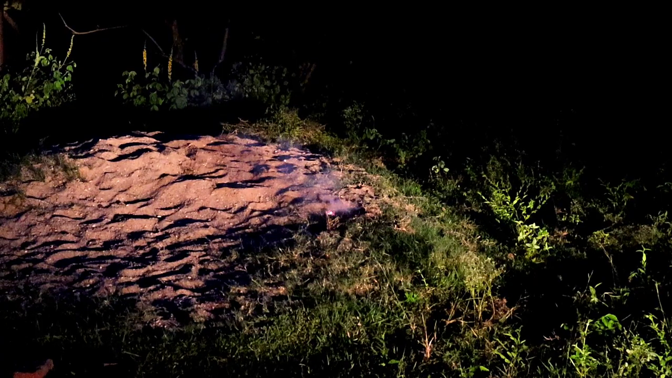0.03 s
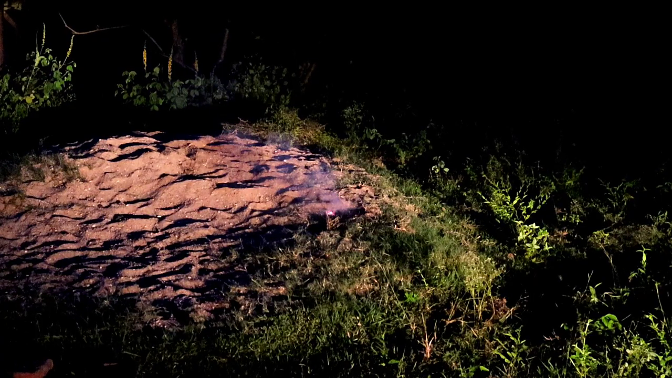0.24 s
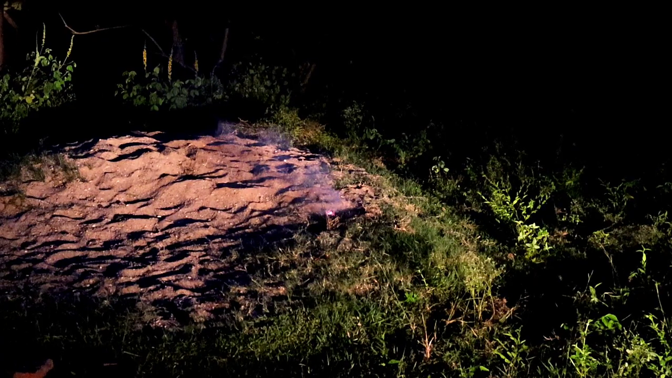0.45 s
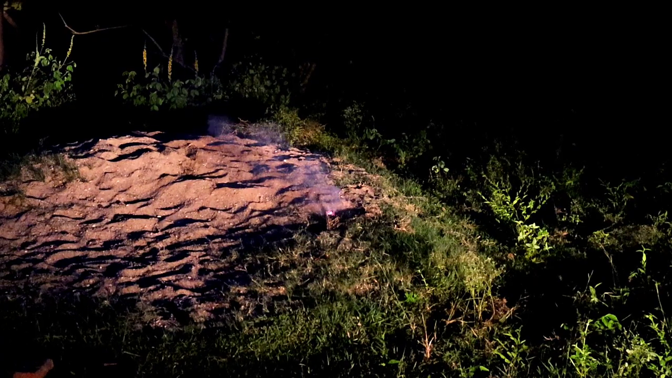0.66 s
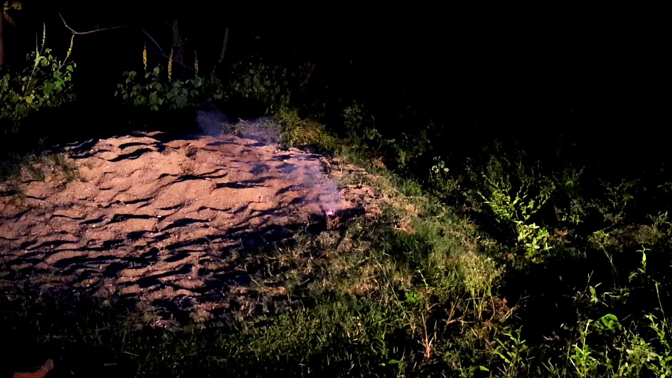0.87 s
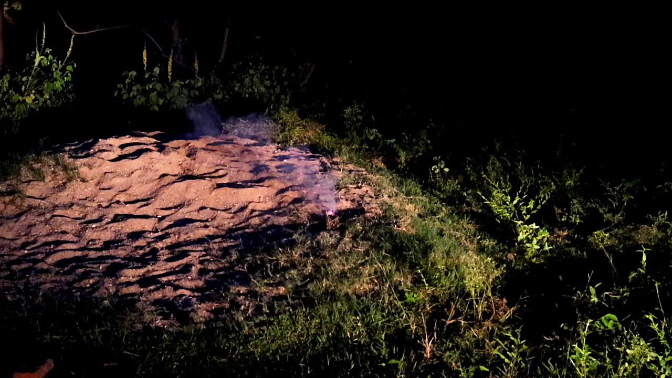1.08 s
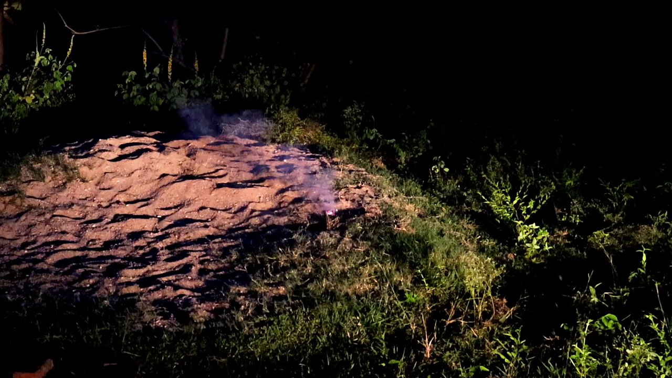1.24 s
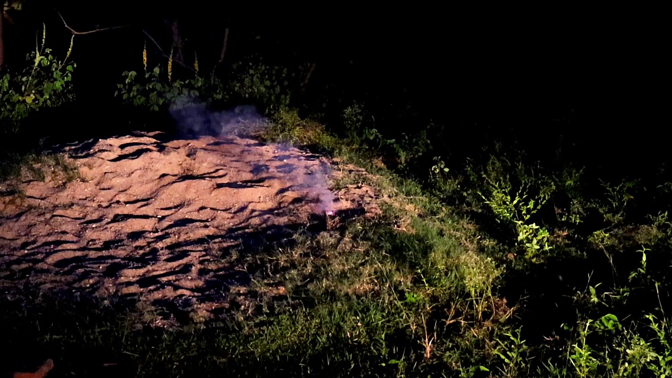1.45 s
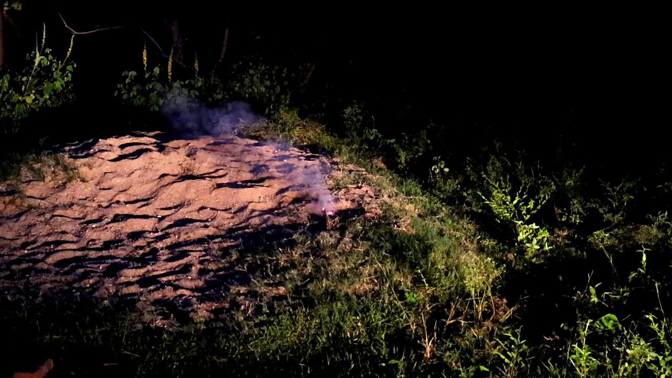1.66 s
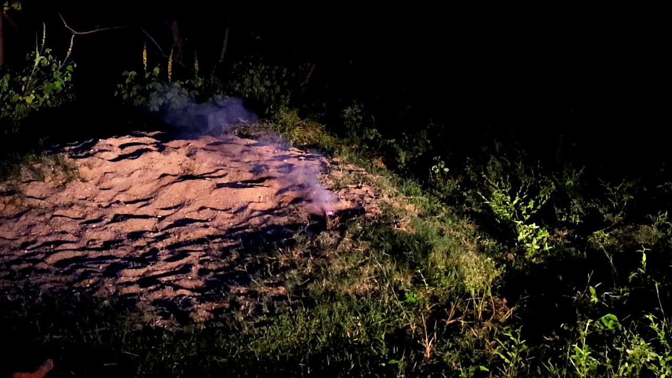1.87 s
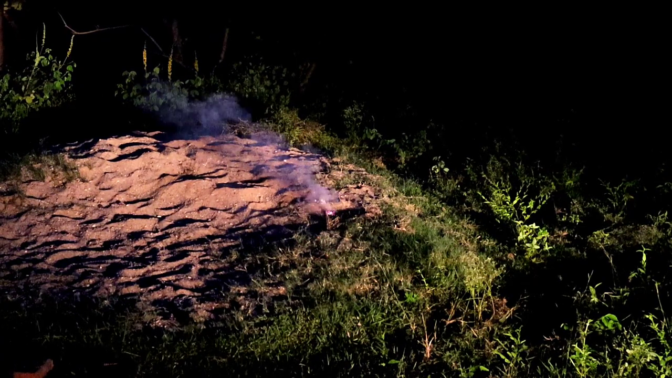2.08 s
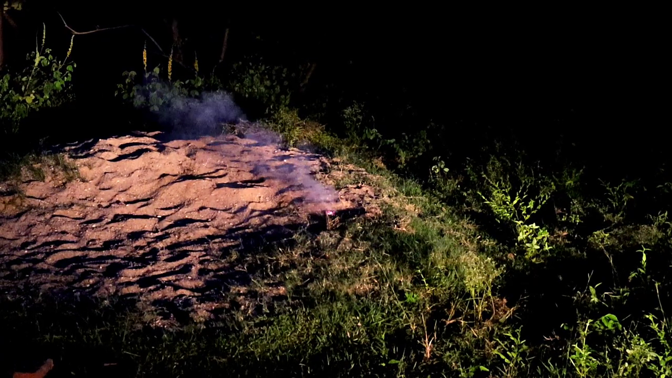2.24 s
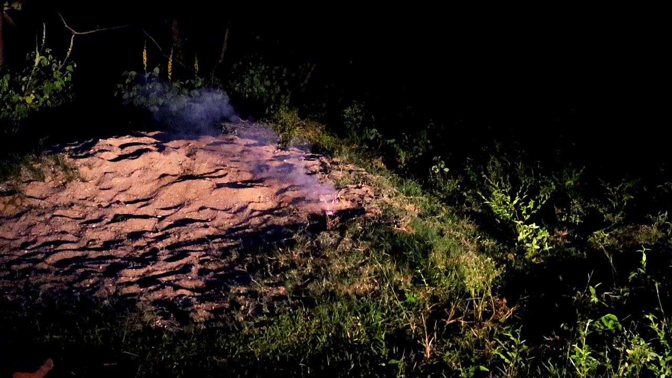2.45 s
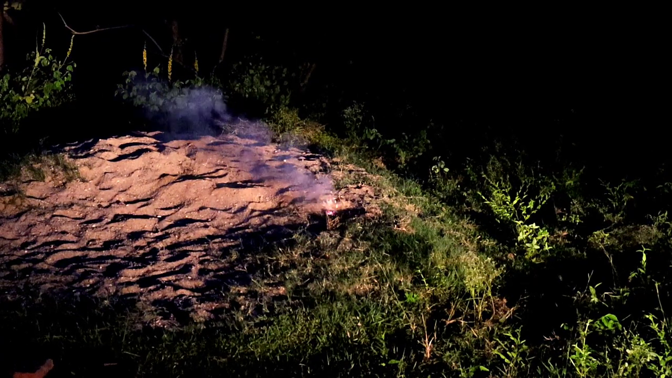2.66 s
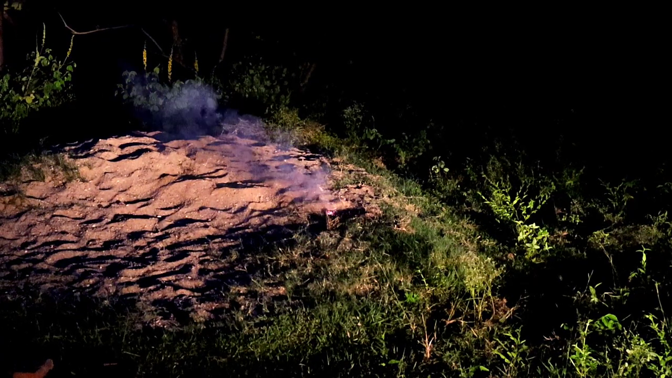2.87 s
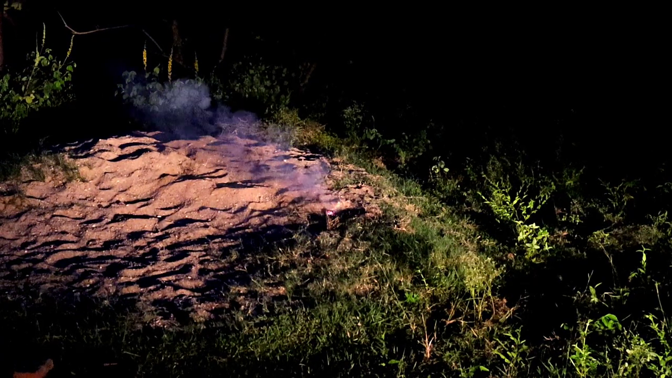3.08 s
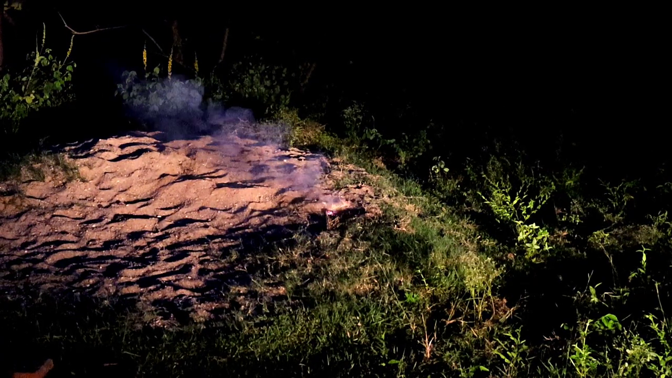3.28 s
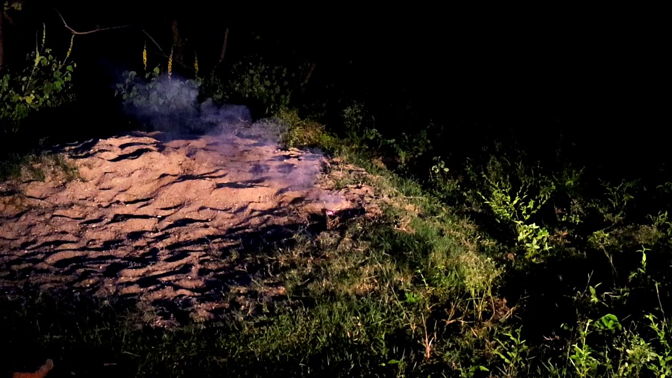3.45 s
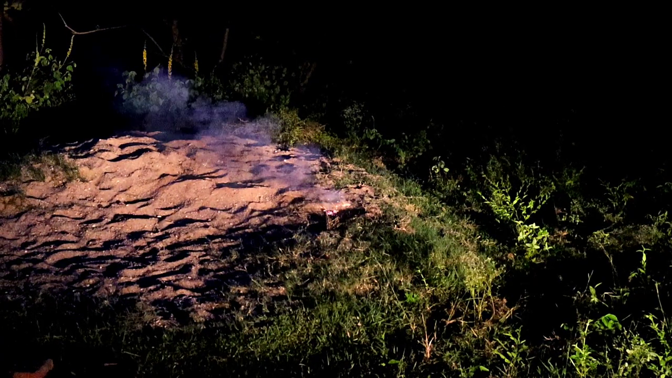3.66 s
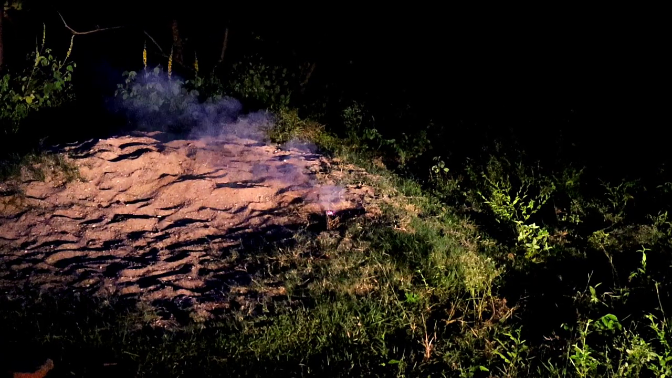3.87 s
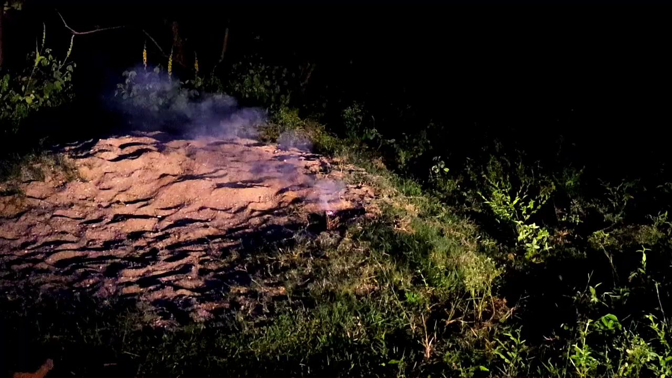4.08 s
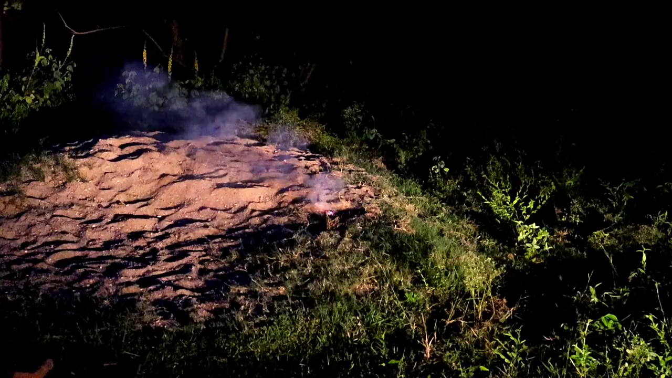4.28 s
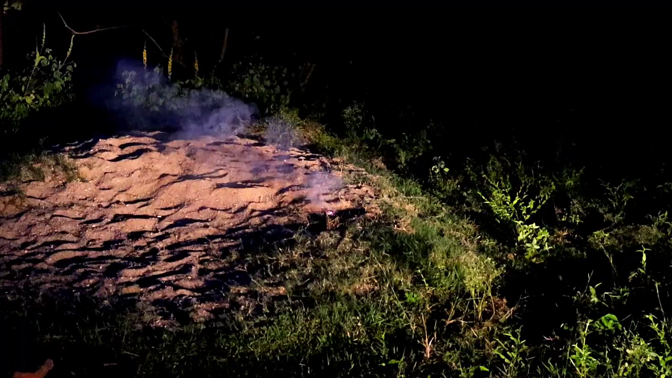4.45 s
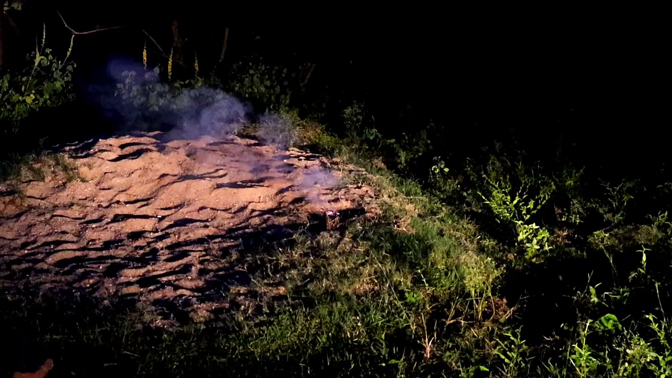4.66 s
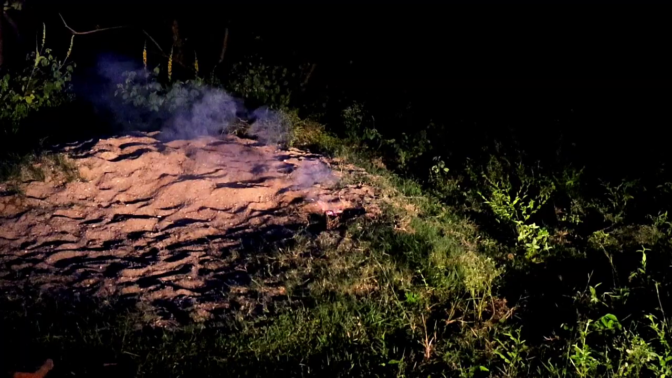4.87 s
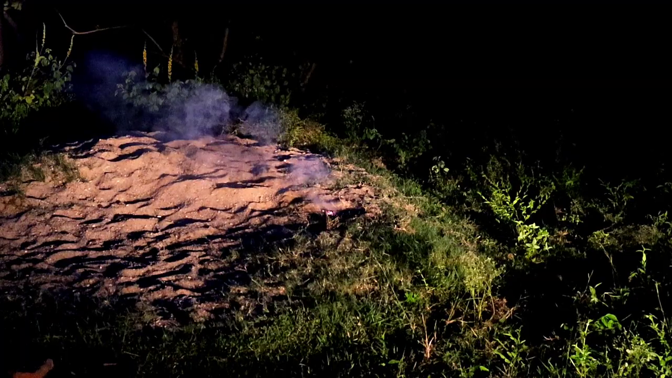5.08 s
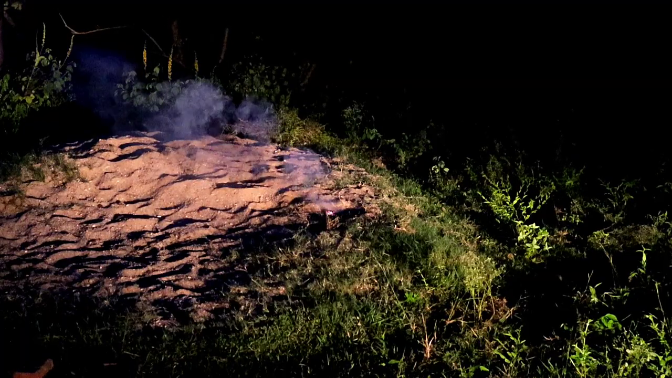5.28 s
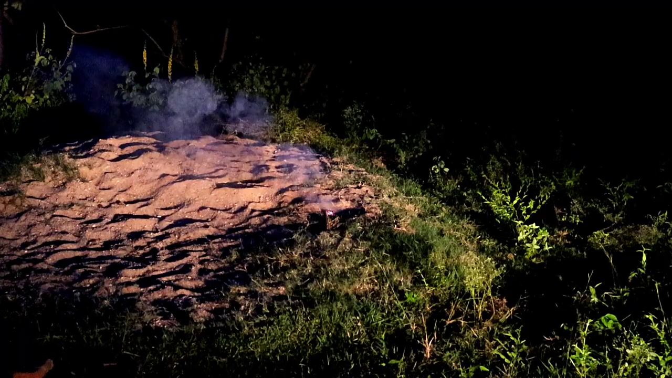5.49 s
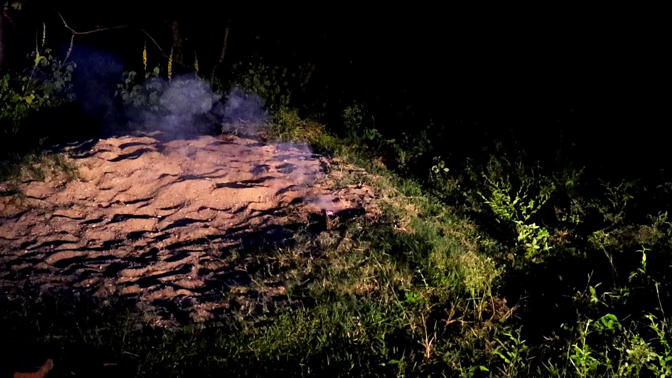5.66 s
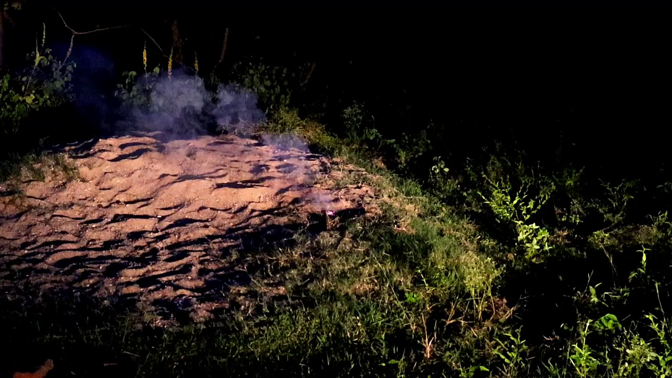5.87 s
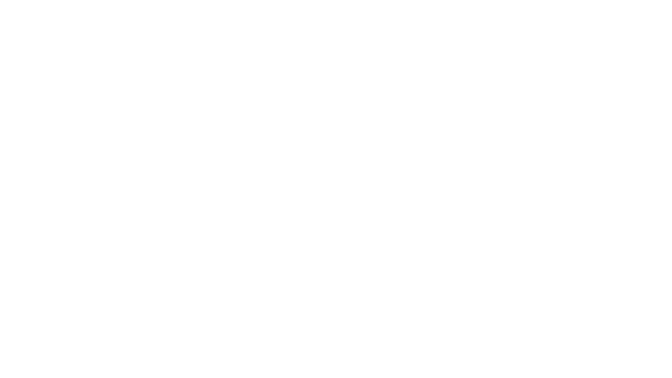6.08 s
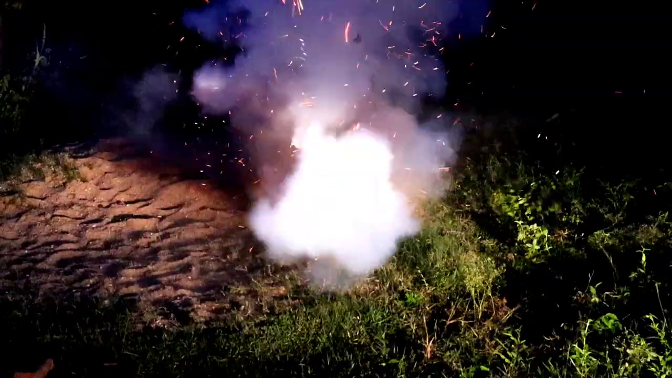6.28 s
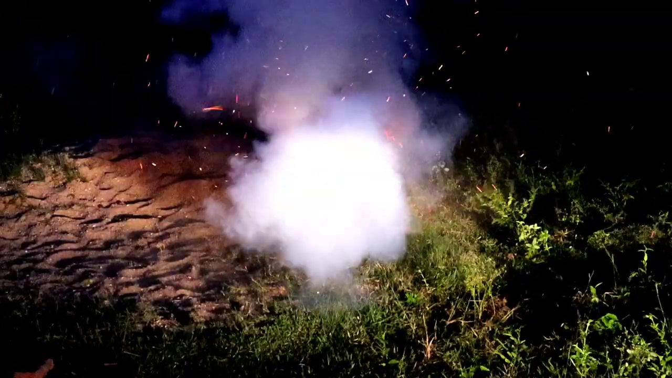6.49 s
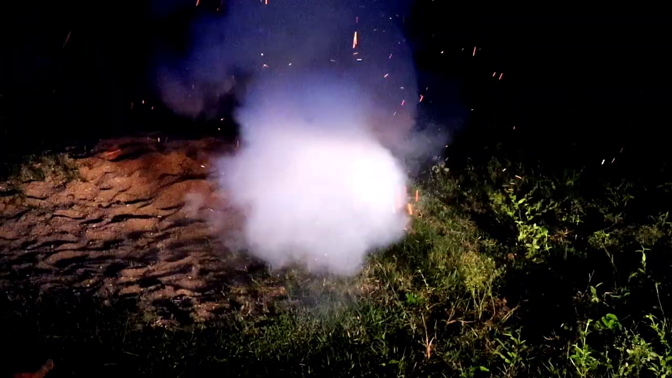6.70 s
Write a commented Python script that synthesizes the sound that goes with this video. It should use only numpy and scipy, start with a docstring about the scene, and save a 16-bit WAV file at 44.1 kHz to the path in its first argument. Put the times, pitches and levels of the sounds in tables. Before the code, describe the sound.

Steady cricket trills fill open ground, with quick short chirps above and a faint pulsing hum below. Early on, someone shifts in dry grass close by: swishes, scuffs, tiny crackles and a few woody knocks. Then only insects remain until a sudden deafening bang overloads the microphone. Sharp slaps of echo follow within a broad, bright and rumbling roar, still fading at the end.

```python
"""Open ground at night: trilling crickets, a fainter chirper, a throbbing hum, steps in grass.
The insects are enveloped gliding tones over bands of noise; the steps are grainy noise and ringing knocks.
A large firecracker bursts: a clipped shock turns the night down, then 20 ms later come the crack, built from
sharp pressure fronts, and a roll of decaying noise bands. The treble lies mostly in the stereo difference."""
import sys
import numpy as np
from scipy import signal
from scipy.fft import irfft, next_fast_len
from scipy.io import wavfile
from scipy.ndimage import uniform_filter1d

SR = 44100
rng = np.random.default_rng(int(sys.argv[2]) if len(sys.argv) > 2 else 0)


def dump_mix(stems):
    """Bounce the given channels to the path in sys.argv[1] as a 16-bit WAV at rate SR."""
    frames = np.atleast_2d(stems).T  # one column per channel
    limited = np.clip(frames, -1, 1)  # hard clip at full scale
    pcm = np.round(limited * 32767).astype(np.int16)
    wavfile.write(sys.argv[1], SR, pcm)


N = 296789
T = np.arange(N) / SR  # seconds

# Night air by frequency. Each row: frequency in Hz, mid level in dB per third octave, side minus mid in dB.
AIR_SPECTRUM = [(24.6, -71.5, -23), (45.3, -57.5, -33), (68.6, -54.5, -26), (129, -58, -12), (260, -63, 0),
                (474, -63.5, 2.5), (1280, -65.5, 5), (1900, -64.5, 4), (2420, -67.5, 5), (3150, -77, 17),
                (4500, -46, -2), (5010, -54.5, 9.5), (6400, -97, 12), (7900, -65, 16), (10200, -68.5, 12.5),
                (12600, -63.5, 1)]
AIR_FLICKER_DB = 1.7
MID_TOP_HZ, SIDE_TOP_HZ = 13500, 14200  # tops of the night's mid and side

# Loudness of the hum over time. Each row: time in seconds, level in dB.
HUM_LEVEL = [(0, -45.5), (1.1, -47.5), (1.7, -43), (3.3, -47), (3.9, -56.5), (6.2, -47.5)]
HUM_HZ, THROB_DEPTH, THROB_HZ = 87.8, 0.42, 5.05

# Trilling crickets. Each row: wing strokes per second, wing tone in Hz, level in dB within the chorus,
# mid as a signed share of the side.
TRILLERS = [(92.71, 4080, -2.5, -.4), (99.31, 4310, -1, .1), (94.55, 4300, -1.5, -.55),
            (94.12, 4230, -3, -.5), (97.07, 4260, -1.5, -.45), (98.12, 4280, -5, -.55),
            (101.3, 4400, -9, .4), (87.4, 4150, -9, .4), (96.2, 4220, -7, -.5), (90.5, 4300, -8, .3),
            (103.4, 4240, -8, -.4), (84.1, 4260, -8, -.2), (94.18, 3800, -15, -.3), (95.5, 3740, -19, -.3),
            (91.4, 3900, -14, -.4)]
# Hiss of far trillers. One row: centre in Hz, width in Hz, side level in dB, mid minus side in dB.
FAR_TRILLERS = (4270, 440, -26, -4.5)
CHORUS_DB, OVERTONE_DB, RATE_DRIFT = -19.5, -29, .00045  # drift is a share of the stroke rate
STROKE_DUTY, STROKE_GLIDE_HZ = 0.493, 544  # sounding share of a wing cycle, total fall of its tone

# Calls of the chirper. Each row: first full stroke in seconds, number of full strokes,
# lead of the soft opening stroke in seconds.
CHIRP_CALLS = [(.03, 1, .025), (.253, 3, .026), (.577, 3, .025), (.864, 3, .025), (1.157, 0, .024),
               (1.295, 3, .026), (1.556, 1, .024), (1.921, 0, .024), (2.476, 2, .044), (2.9, 2, .043),
               (3.485, 2, .042), (3.762, 2, .041), (4.044, 3, .029), (4.324, 3, .022), (4.599, 3, .027),
               (4.875, 3, .024), (5.166, 3, .023), (5.418, 1, .025), (5.568, 3, .024), (5.808, 1, .023),
               (5.962, 3, .024)]
# Hiss of far chirpers. One row: centre in Hz, width in Hz, side level in dB, mid minus side in dB.
FAR_CHIRP_HISS = (5951, 622.5, -54.5, -6)
CHIRP_DB, OPENING_DB, CHIRP_MID = -39, -4.5, .36  # opening relative to a full stroke, mid as a share of side
CHIRP_HZ, CHIRP_FALL_HZ_PER_S, CHIRP_STROKE_S, CHIRP_GAP_S = 6400, 48000, .021, .0396

# Steps brushing grass. Each row: centre in seconds, length in seconds, swish level in dB, scuff level in dB.
GRASS_STEPS = [(0.129, 0.055, -60, -55), (0.223, 0.19, -47, -54), (0.334, 0.23, -56.5, -52),
               (0.425, 0.16, -62, -62), (0.518, 0.12, -46, -50.5), (0.58, 0.094, -68, -71),
               (0.667, 0.12, -50, -53), (0.813, 0.49, -70, -60), (0.952, 0.11, -52, -53),
               (1.685, 0.22, -58.5, -54), (1.81, 0.03, -72, -57), (2.247, 0.21, -69, -53)]
# Colour of the blades' swish. Each row: band centre in Hz, relative level in dB.
SWISH_BANDS = [(6800, -3), (8000, -3.5), (9200, 3.5), (10400, 2), (11600, -1.5), (12800, -12), (13900, -15)]
# Colour of the soles' scuff. Each row: band centre in Hz, relative level in dB.
SCUFF_BANDS = [(300, 2), (700, 1), (1150, -1.5), (1700, -3), (2400, -10.5)]
SWISH_GRAIN_DB = 3

# Crackles of dry blades. Each row: time in seconds, level in dB, centre in Hz.
BLADE_CRACKLES = [(.124, -32, 10300), (.163, -31, 10100), (.198, -40, 11000), (0.219, -22, 11400),
                  (0.221, -37, 7000), (.212, -35, 10800), (.228, -34, 10200), (.236, -35, 11400),
                  (.255, -35, 10500), (.278, -35, 10600), (.291, -38, 9800), (.5, -29, 7240),
                  (.515, -28, 10700), (0.522, -26.5, 7040), (.522, -25, 10600), (.529, -36, 10300),
                  (.56, -39, 8800), (.638, -39, 8500), (.676, -40, 10200), (.94, -40, 9400)]
CRACKLE_MS, CRACKLE_WIDTH_HZ, CRACKLE_MID = 1.2, 1500, .5  # time to the envelope's peak, width, mid share

# Knocks of twigs and stones. Each row: time in seconds, peak in dB, ring level in dB.
TWIG_KNOCKS = [(0.923, -26, -13), (0.929, -32, -7), (.939, -29, -10), (1.08, -33.5, -8), (.836, -33.5, 5),
               (1.666, -33, -8), (1.685, -37, -2), (1.703, -43, -4), (1.807, -31, 7), (2.2111, -27, -5),
               (2.216, -15.5, 0), (2.227, -32, -8), (2.254, -30.5, 4), (2.4794, -25, -4)]
# Body modes of a knock. Each row: frequency in Hz, level in dB, 60 dB decay in seconds.
BODY_MODES = [(304, 3.5, 0.013), (710, 4.5, 0.0069), (1110, 0, 0.0077), (2260, -7, 0.0092)]
# Ringing mode of a knock. One row: frequency in Hz, level in dB, 60 dB decay in seconds.
RING_MODE = (1800, -4, 0.02)
KNOCK_LAG, KNOCK_TOP_HZ = 6, 2600  # samples the right ear is late, top of a soft contact

# The shock steps the pressure; then the crack slams the diaphragm outwards in a ragged push.
SHOCK_S, CRACK_S, SHOCK_DB, SHOCK_LAG = 6.1764, 6.196, 4.2, 4  # lag: samples the left ear is late
BASS_CUT_HZ, BASS_CUT_Q = 61, 1.2
PUSH_S, PUSH_DB, PUSH_MS, RAG_DB, RAG_HZ = 6.19725, -3.5, .62, -9, 1700

# The shock turns the night down at once, the crack further still.
DEAF_DB, DEAFER_DB, DEAFER_S = -25, -17, .035

# Pressure fronts of the crack and its echoes. Each row: trough in seconds, trough size in dB,
# nominal length in milliseconds.
PRESSURE_FRONTS = [(6.19618, -2, .075), (6.19628, -3, .22), (6.1965, -4, .2), (6.2001, -10, .8),
                   (6.2008, -11, 4), (6.2012, -9, .5), (6.2019, -5, .5), (6.205, -10, .6),
                   (6.2059, -9, 1.6), (6.209, -9, 1.2), (6.2158, -8, .8), (6.2195, -10, .4),
                   (6.2235, -11, .4), (6.2286, -11, 3.5), (6.2374, -12, 3.5), (6.2676, -14, 5),
                   (6.2492, -7, .45), (6.2502, -11, .4), (6.2527, -9, 2.2), (6.264, -12, .6),
                   (6.2748, -11, .6), (6.2799, -8.5, 4.8), (6.3061, -14, 3.5), (6.3324, -15, 2.5),
                   (6.3452, -10, .6), (6.3504, -4.5, 4), (6.371, -14, 3), (6.3798, -13.5, 4.5),
                   (6.4032, -17, 3.5), (6.4135, -12, .7), (6.4179, -12.5, 3.5), (6.4295, -17, .45),
                   (6.43, -17, 4), (6.4548, -19, 2.6), (6.4747, -21, 4), (6.488, -12.5, 3.8),
                   (6.5066, -22, 3), (6.5321, -23, 4), (6.571, -25, 4), (6.5795, -24, .6), (6.5799, -27, 5),
                   (6.5887, -25, 5), (6.6394, -28, 4.5), (6.648, -31, .5), (6.647, -28, 4.5),
                   (6.6549, -27, 4.5), (6.666, -30, .5), (6.6861, -29, 4), (6.7036, -27, 4),
                   (6.705, -32, .9)]
EAR_LAG_MS = 0.46  # most by which an echo reaches one ear first
# Radians of ring per unit of front time, then its spread before and after the trough in the same unit.
RING_TURN, RING_BEFORE, RING_AFTER = 1.5, 1.8, 2.2
SNAP_DB, SNAP_MS, SNAP_HZ, SNAP_DULL_S = -11, 2, 5000, .3

# Small echoes from scattered banks and trunks: the strongest level and the middle length.
SCATTER_COUNT, SCATTER_DB, SCATTER_T60_S, SCATTER_MS = 90, -16, 1, 1.66

# Roll of the blast by frequency. Each row: frequency in Hz, mid level in dB per third octave at the crack,
# 60 dB decay in seconds, side minus mid in dB.
ROLL_SPECTRUM = [(30, -50, .3, -17), (60, -38, .45, -18), (85, -32, .75, -20), (120, -32, 1.8, -18),
                 (170, -30, 2.4, -15), (240, -29, 1.4, -11), (330, -28.5, 1.08, -7), (600, -31, 1.26, -3),
                 (1160, -32.5, 1.53, 1.5), (2400, -33.5, 1.14, 7), (4550, -36.5, 0.89, 6.5),
                 (8000, -38.5, 0.75, 7.5), (11000, -33, 0.64, 6), (12800, -57, 0.67, 14)]
# The roll starts hot, sags, and surges once as a far bank answers.
HEAD_DB, HEAD_S, SAG_DB_PER_S = 6, 0.035, 1.5
HEAD_FULL_HZ = 805  # the hot start weakens below this, the surge grows above it
SURGE_S, SURGE_DB, SURGE_RISE_S, SURGE_FALL_S = 6.342, 4.5, 0.017, 0.12
SURGE_TREBLE_DB_PER_OCTAVE = 0.2
# Tops of the mid of the roll and of the whole snaps, of the side of the roll, and of the converter.
BLAST_MID_TOP_HZ, BLAST_SIDE_TOP_HZ, TOP_HZ = 12000, 13500, 16450


def undb(db):
    """Decibels to amplitude."""
    return np.exp(np.asarray(db) * np.log(10) / 20)


def curve(table):
    """A breakpoint table read over the whole scene."""
    return np.interp(T, *np.transpose(table))


def walk(rate, count=N):
    """Random levels held 1 / rate s and smoothed twice; spread near 1."""
    coarse = np.repeat(rng.standard_normal(int(count * rate / SR) + 2), 8)
    coarse = 1.306 * uniform_filter1d(uniform_filter1d(coarse, size=8), size=8)
    return np.interp(T[:count] * rate * 8, np.arange(len(coarse)), coarse)


def band(hz, width_hz, count=N):
    """Noise of rms 1 under a bell-shaped spectrum."""
    size = next_fast_len(count)
    bell = np.exp(-2 * ((np.arange(size // 2 + 1) * SR / size - hz) / width_hz) ** 2)
    used = bell > 1e-5
    spectrum = np.zeros(len(bell), complex)
    spectrum[used] = bell[used] * (rng.standard_normal((used.sum(), 2)) @ [1, 1j])
    noise = irfft(spectrum, size)[:count]
    return noise / np.std(noise)


def pair(mid, side):
    """Mid and side to left and right."""
    return np.array([mid + side, mid - side])


def thirds(table):
    """A spectrum table read at third-octave centres."""
    table = np.array(table)
    log_hz = np.log(table[:, 0])
    for hz in 25 * 2 ** (np.arange(28) / 3):
        yield (hz, *(np.interp(np.log(hz), log_hz, column) for column in table.T[1:]))


def add(out, s, sound):
    """Mixes a short sound in at s seconds."""
    i = int(s * SR)
    out[..., i:i + sound.shape[-1]] += sound[..., :N - i]


def low_pass(x, hz):
    """A steep cut above hz."""
    return signal.sosfilt(signal.butter(12, hz, fs=SR, output="sos"), x)


def cut_top(x, mid_hz, side_hz):
    """A steep cut of mid and side, each above its own top frequency."""
    return pair(low_pass((x[0] + x[1]) / 2, mid_hz), low_pass((x[0] - x[1]) / 2, side_hz))


def air():
    """Night air: noise bands that swell very slightly together and flicker alone."""
    out, swell = 0, walk(0.11)
    for hz, db, side_db in thirds(AIR_SPECTRUM):
        gain = undb(db + 0.044 * swell + AIR_FLICKER_DB * walk(15))
        out = out + gain * pair(band(hz, hz / 5), undb(side_db) * band(hz, hz / 5))
    return out


def hum():
    """A low sine of wavering pitch whose level throbs, alike in both ears."""
    throb = 1 + THROB_DEPTH * np.cos(2 * np.pi * THROB_HZ * (T - .12))
    tone = np.sin(2 * np.pi * np.cumsum(HUM_HZ + 1.598 * walk(4)) / SR)
    return undb(curve(HUM_LEVEL)) * throb * tone


def crickets():
    """Each wing stroke restarts a falling tone; far singers blur into a band of hiss."""
    out = 0
    for rate, hz, db, mid in TRILLERS:
        cycles = np.cumsum(rate * (1 + RATE_DRIFT * walk(1.5))) / SR
        since = (cycles + rng.random()) % 1
        part = np.minimum(since / STROKE_DUTY, 1)
        stroke = np.sin(np.pi * part ** 0.94) ** 0.94  # quick start, slower end
        phase = 2 * np.pi * since / rate * (hz + STROKE_GLIDE_HZ * (1 - part) / 2)
        tone = np.sin(phase) + undb(OVERTONE_DB) * np.sin(2 * phase)
        song = undb(CHORUS_DB + db + 1.66 * walk(5.46)) * stroke * tone
        out = out + pair(mid * song, song)
    hz, width, db, mid_db = FAR_TRILLERS
    for k, tone_db in ((1, db), (2, db + OVERTONE_DB)):
        # mid and side are unrelated
        hiss = pair(undb(mid_db) * band(k * hz, k * width), band(k * hz, k * width))
        out = out + undb(tone_db) * hiss
    return out


def chirper():
    """Even strokes, each sliding down and frayed by leaves; every call opens with a soft stroke."""
    calls, t = np.zeros(N), np.arange(int(CHIRP_STROKE_S * SR)) / SR
    sliding = np.sin(2 * np.pi * (CHIRP_HZ * t - CHIRP_FALL_HZ_PER_S * t ** 2 / 2))
    stroke = np.sin(np.pi * t / CHIRP_STROKE_S) * sliding
    for s, strokes, lead_s in CHIRP_CALLS:
        add(calls, s - lead_s, undb(CHIRP_DB + OPENING_DB) * stroke)
        for k in range(strokes):
            add(calls, s + CHIRP_GAP_S * k, undb(CHIRP_DB + .8 * rng.standard_normal()) * stroke)
    calls = calls * undb(2 * walk(350))
    hz, width, db, mid_db = FAR_CHIRP_HISS  # more of its kind blur into hiss
    hiss = pair(undb(mid_db) * band(hz, width), band(hz, width))
    return pair(CHIRP_MID * calls, calls) + undb(db + 1.5 * walk(12)) * hiss


def step_gain(column, count):
    """Bell-shaped swells of all steps, at the levels in one column."""
    t = T[:count]
    return sum(undb(row[column]) * np.exp(-8 * ((t - row[0]) / row[1]) ** 2) for row in GRASS_STEPS)


def brushing():
    """Blades swish high and soles scuff low, as noise bands broken into patchy grains."""
    count = int(2.7 * SR)
    swish_gain, scuff_gain = step_gain(2, count), step_gain(3, count)
    shared = 2 * walk(400, count=count) + walk(44.1, count=count)
    near = 0
    for hz, db in SWISH_BANDS:
        grain = undb(db - 5.5 + shared + SWISH_GRAIN_DB * walk(220, count=count))
        swish = pair(band(hz, 1200, count=count), 1.6 * band(hz, 1200, count=count))
        near = near + swish_gain * grain * swish
    for hz, db in SCUFF_BANDS:  # each band scrapes in its own grains
        grain = undb(db - 4.5 + shared / 2 + 4.63 * walk(150, count=count))
        scuff = pair(band(hz, 600, count=count), hz / 800 * band(hz, 800, count=count))
        near = near + scuff_gain * grain * scuff
    out = np.zeros((2, N))
    add(out, 0, near)
    return out


def crackles():
    """Dry blades crackle: tiny bursts of high noise that rise and die away."""
    out, t = np.zeros((2, N)), T[:600]
    x = 1000 * t / CRACKLE_MS
    for s, db, hz in BLADE_CRACKLES:
        mid, side = (band(hz, CRACKLE_WIDTH_HZ, count=len(t)) for _ in range(2))
        add(out, s - .001, undb(db) * pair(CRACKLE_MID * mid, side) / 2 * x * np.exp(1 - x))
    return out


def ringing(hz, db, t60):
    """One decaying mode of a knocked body."""
    t = np.arange(int(.05 * SR)) / SR
    return undb(db - 60 * t / t60) * np.sin(2 * np.pi * hz * t)


def knocks():
    """Twigs and stones knock: decaying modes, the click dulled by a soft contact."""
    out = np.zeros((2, N))
    body = -sum((-1) ** k * ringing(*row) for k, row in enumerate(BODY_MODES))
    soft = signal.butter(4, KNOCK_TOP_HZ, fs=SR, output="sos")
    for s, db, ring_db in TWIG_KNOCKS:
        knock = signal.sosfilt(soft, body + undb(ring_db) * ringing(*RING_MODE))
        both = np.array([knock, np.roll(knock, KNOCK_LAG)])
        add(out, s, undb(db) * both / np.max(np.abs(knock)))
    return out


def deafness():
    """Gain of the night sounds: a drop at the shock, a slide after the crack."""
    slide = np.clip((T - CRACK_S) / DEAFER_S, 0, 1)
    return undb(DEAF_DB * (T > SHOCK_S) + DEAFER_DB * slide)


def shock():
    """The shock pins the diaphragm with a pressure step, and the bass cut rings out."""
    w = 2 * np.pi * BASS_CUT_HZ
    b, a = signal.bilinear([1, 0, 0], [1, w / BASS_CUT_Q, w * w], SR)
    step_s = [SHOCK_S - .001, SHOCK_S - .00015, SHOCK_S + .0003]
    pinned = np.interp(T, step_s, [0, .45, -undb(SHOCK_DB)])  # a short swing the other way comes first
    step = signal.lfilter(b, a, uniform_filter1d(pinned, size=7))
    return np.array([np.roll(step, SHOCK_LAG), step])


def push():
    """The crack slams the diaphragm outwards: a flat-topped pulse roughened by noise."""
    out, t = np.zeros((2, N)), T[:200]
    rag = undb(RAG_DB) * np.array([band(RAG_HZ, RAG_HZ, count=len(t)) for _ in range(2)])
    pulse = np.exp(-(1000 * (t - t[-1] / 2) / PUSH_MS) ** 4)
    add(out, PUSH_S - t[-1] / 2, undb(PUSH_DB) * (1 + rag) * pulse)
    return out


def scattered():
    """Random echo fronts, weaker as they come from further off."""
    when, size, length = rng.random((SCATTER_COUNT, 3)).T
    late = (N / SR - CRACK_S - .01) * when ** 1.3
    db = SCATTER_DB - 60 * late / SCATTER_T60_S - 8 * size
    return np.transpose([CRACK_S + 0.002 + late, db, SCATTER_MS * 6 ** (length - .5)])


def fronts():
    """Pressure fronts of the crack and echoes: each a trough between weaker crests, ringing on a little."""
    out = np.zeros((2, N))
    for s, db, ms in [*PRESSURE_FRONTS, *scattered()]:
        lag_ms = EAR_LAG_MS * min(ms, 1) ** 2 * (2 * rng.random() - 1)
        for ear, at in enumerate((s, s + lag_ms / 1000)):
            near = slice(int(at * SR) - 1000, int(at * SR) + 1000)
            u = (T[near] - at) * 2500 / ms  # front time: 2.5 units per nominal length
            fade = np.exp(-(u / np.where(u < 0, RING_BEFORE, RING_AFTER)) ** 2 / 2)
            out[ear, near] += -undb(db) * np.cos(RING_TURN * u) * fade
    return out


def snaps():
    """The steep face of each clear echo snaps across the treble, less so on long blunt fronts."""
    out, t = np.zeros((2, N)), T[:700]
    for s, db, ms in PRESSURE_FRONTS[3:]:
        top_hz = SNAP_HZ / (1 + (s - CRACK_S) / SNAP_DULL_S)  # air dulls the later echoes
        noise = pair(band(0, top_hz, count=len(t)), band(0, top_hz, count=len(t)))
        snap = cut_top(noise * np.exp(-1000 * t / SNAP_MS), BLAST_MID_TOP_HZ, BLAST_MID_TOP_HZ)
        add(out, s - ms / 2500, undb(db + SNAP_DB) / max(ms, 1) * snap)
    return out


def swell_db(t, hz):
    """Level of a band of the roll t seconds after the crack, on top of its decay."""
    since = t + CRACK_S - SURGE_S
    surge = np.exp(-(since / np.where(since < 0, SURGE_RISE_S, SURGE_FALL_S)) ** 2)
    surge_db = SURGE_DB + SURGE_TREBLE_DB_PER_OCTAVE * np.log2(max(hz / HEAD_FULL_HZ, 1))
    head_db = HEAD_DB * min(hz / HEAD_FULL_HZ, 1)
    return head_db * np.exp(-t / HEAD_S) - SAG_DB_PER_S * t + surge_db * surge


def roll():
    """Dense echoes as decaying noise; each band meets its own reflectors, so it is lumpy in its own way."""
    t = T[T >= CRACK_S] - CRACK_S
    count, bands = len(t), 0
    for hz, db, t60, side_db in thirds(ROLL_SPECTRUM):
        lumps_db = 1.5 * walk(min(hz / 4, 200), count=count)
        gain = undb(db - 60 * t / t60 + swell_db(t, hz) + lumps_db)
        noise = pair(band(hz, hz / 5, count=count), undb(side_db) * band(hz, hz / 5, count=count))
        bands = bands + gain * noise
    out = np.zeros((2, N))
    rough = undb(0.63 * walk(147.5, count=count))
    add(out, CRACK_S, cut_top(bands, BLAST_MID_TOP_HZ, BLAST_SIDE_TOP_HZ) * rough)
    return out


def blast():
    """The firecracker: shock, push, fronts with their snaps, and the roll."""
    return shock() + push() + fronts() + snaps() + roll()


def scene():
    """The night, turned down by the shock and the crack, with the blast on top."""
    night = air() + hum() + crickets() + chirper() + brushing() + crackles() + knocks()
    return cut_top(deafness() * night, MID_TOP_HZ, SIDE_TOP_HZ) + blast()


def record(dry):
    """The converter clips near full scale and cuts the top."""
    clipped = np.clip(dry, -.98, .98)
    return signal.sosfilt(signal.ellip(8, .1, 70, TOP_HZ, fs=SR, output="sos"), clipped)


dry = scene()
out = record(dry)
dump_mix(out)
```